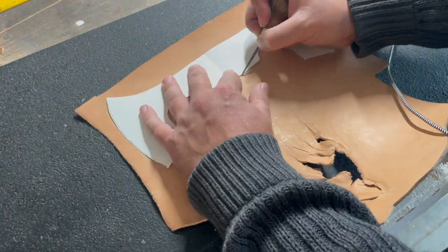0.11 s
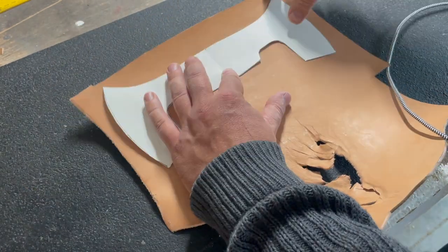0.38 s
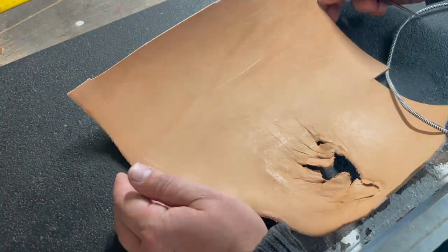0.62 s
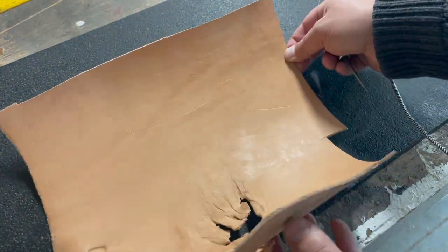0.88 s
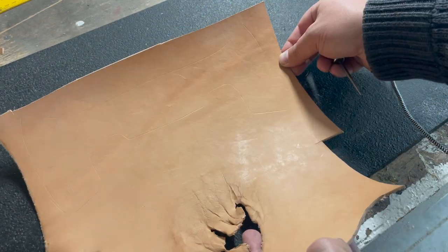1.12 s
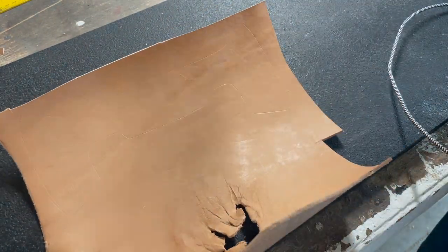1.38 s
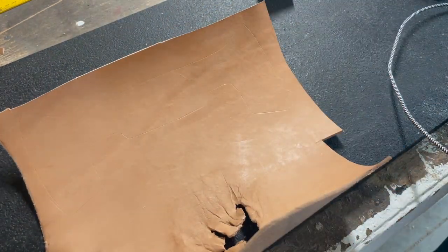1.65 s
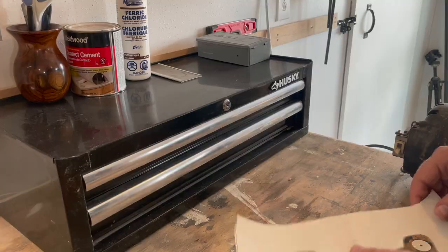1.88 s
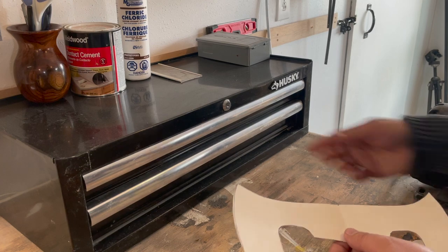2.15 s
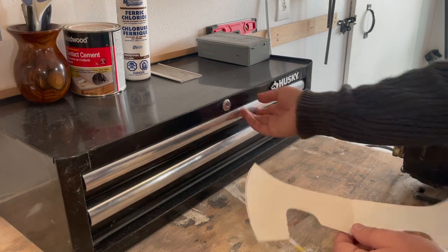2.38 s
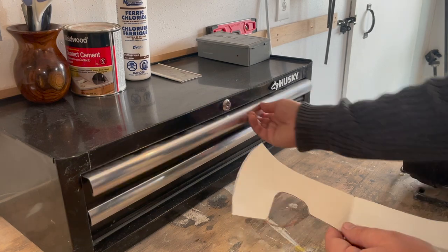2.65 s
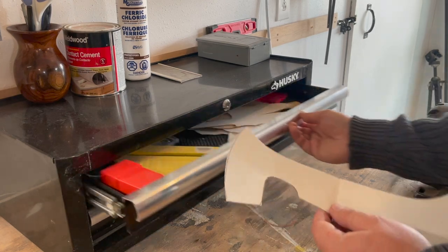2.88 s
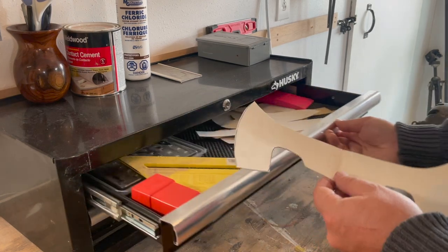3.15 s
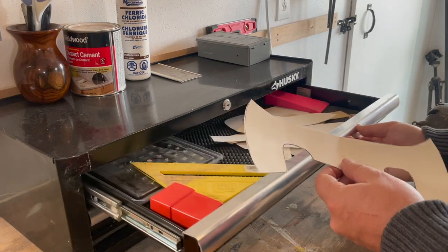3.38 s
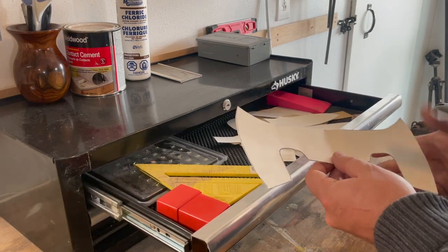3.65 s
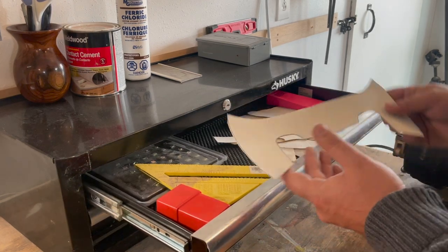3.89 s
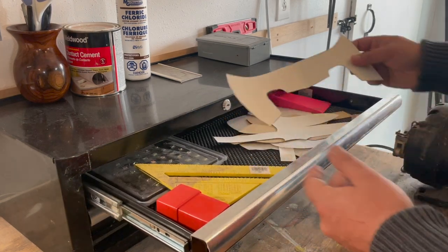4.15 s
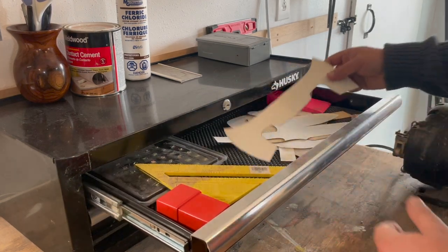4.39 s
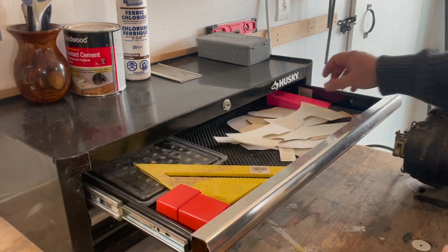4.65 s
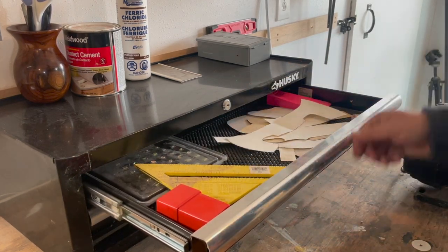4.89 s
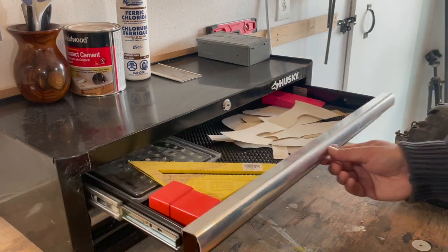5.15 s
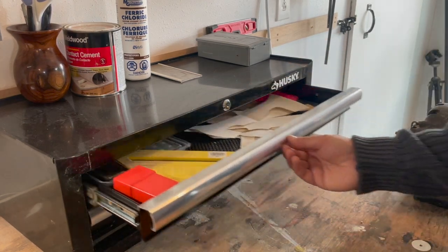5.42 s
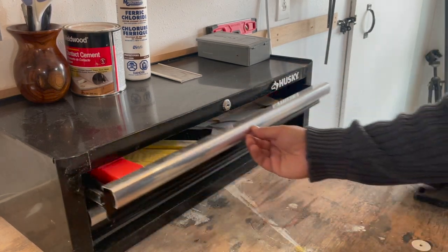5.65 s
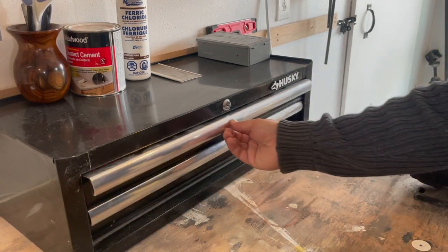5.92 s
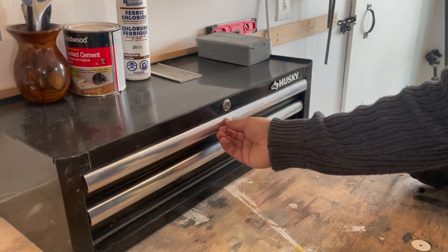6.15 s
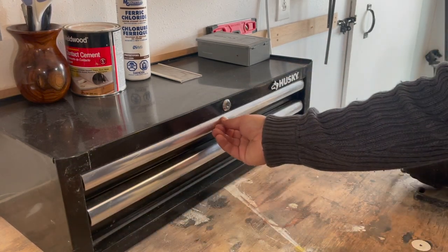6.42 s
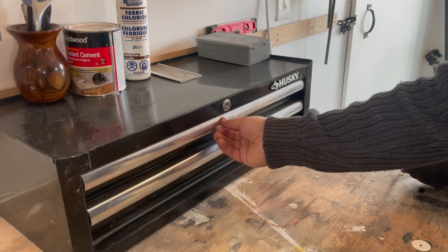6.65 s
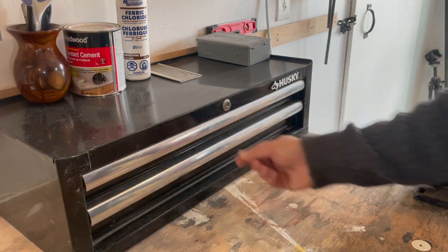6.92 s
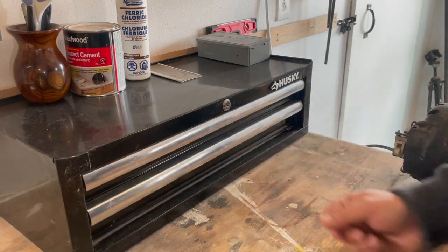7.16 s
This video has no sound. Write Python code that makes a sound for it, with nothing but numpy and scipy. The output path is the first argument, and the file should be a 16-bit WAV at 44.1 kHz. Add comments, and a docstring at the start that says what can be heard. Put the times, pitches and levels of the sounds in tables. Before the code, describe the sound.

Hurried bassless scrapes and ticks at a workbench, then a steel tool chest drawer rolls out, receives a card pattern, and closes with a ringing knock.

```python
"""Thin, bassless scratching and tapping come first: an awl at a leather bench in fast-forward, then a dropped tool.
At normal speed a steel chest drawer is unlatched and rolls out on ball runners, a card pattern is laid in,
and the drawer is pushed shut with a knock that rings the chest and the workshop.
Friction is coloured, fluttering noise; contacts are short bursts in three bands; sheet steel is a set of
decaying modes; the room is a tail of noise whose frequencies die at their own speeds."""
import sys
import numpy as np
from scipy import signal
from scipy.fft import rfft, irfft, next_fast_len
from scipy.io import wavfile
from scipy.ndimage import map_coordinates

SR = 44100
rng = np.random.default_rng(int(sys.argv[2]) if len(sys.argv) > 2 else 0)


def unload_wav(signal):
    """Save mono or channel-first audio to the path in sys.argv[1] as 16-bit WAV at rate SR, clipped to [-1, 1]."""
    wavfile.write(
        sys.argv[1],
        SR,
        np.round(np.clip(np.atleast_2d(signal).T, -1, 1) * 32767).astype(np.int16),
    )


def amplitude_ratio(level_db):
    """Convert a level in decibels to the matching linear amplitude (field) ratio."""
    exponent = np.asarray(level_db, float) / 20
    return 10 ** exponent


N = 321489

CUT_S = 1.813  # the fast-forward ends
SPEED_UP = 8  # the room dies this many times faster in fast-forward

# Contacts; each band peaks above its level by the excess in the band tables
# drawer knocks: t/s, bite level/dB, body level/dB, edge level/dB, chest level/dB (relative)
DRAWER_KNOCKS = [(2.365, -33.5, -34.5, -52, -40.5), (2.385, -38, -35, -57, -44),
                 (2.403, -52, -34.5, -61, -35), (2.4223, -38.5, -49, -67, -27.5),
                 (2.444, -59, -42.5, -75, -45), (2.479, -64, -64, -78, -29.5),
                 (2.505, -64, -60, -76, -40.5), (2.65, -43, -40, -77, -44), (2.682, -35, -44, -67, -52),
                 (2.706, -29, -36.5, -50, -45), (2.714, -35, -45, -64, -55), (2.72, -49, -33, -68, -59),
                 (2.778, -49, -48, -67, -46), (2.807, -54, -53, -72, -45), (2.909, -39, -44, -50, -41),
                 (2.925, -46, -40, -74, -24), (2.9386, -41.5, -30.5, -76, -37), (2.957, -45, -41, -82, -30),
                 (2.995, -60, -46, -80, -39), (4.99, -54, -49, -80, -46.5), (5.319, -64, -58, -75.5, -46),
                 (5.437, -69, -55, -72, -37.5), (5.462, -63, -53, -72, -44), (5.523, -63, -57, -74, -45),
                 (5.6127, -45, -46, -69, -24.5), (5.6297, -39.5, -41.5, -68, -46),
                 (5.641, -47, -41.5, -59, -46), (5.6982, -51, -46, -73, -34), (5.714, -60, -46, -75, -39),
                 (5.747, -58, -52, -72, -45), (5.7701, -43, -41, -62, -33.5),
                 (5.7877, -43.5, -38.5, -49.5, -41), (5.86, -65, -50.5, -72, -42),
                 (6.001, -46, -46, -68, -34), (6.0296, -39.5, -40.5, -64, -35.5),
                 (6.043, -54.5, -38.5, -82, -38.5), (6.106, -56, -49.5, -78, -46),
                 (6.3063, -32.5, -25.5, -45.5, -33.5), (6.3124, -29, -22, -56, -19),
                 (6.333, -36, -33, -58, -42.5), (6.359, -44, -28, -71, -29), (6.373, -48, -35.5, -72, -34),
                 (6.42, -47.5, -40, -58.5, -34), (6.7604, -59.5, -52.5, -68, -41),
                 (6.7986, -70, -51, -77, -41)]
# short contacts with their own ring: card, fingers, loose tools and the clack of the opening drawer:
# t/s, bite level/dB, body level/dB, edge level/dB, ring f/Hz
RINGING_SNAPS = [(1.816, -42.5, -40, -58, 2120), (1.899, -58, -40.5, -56, 1880),
                 (1.919, -40, -42, -56, 5800), (1.933, -50, -48, -60, 1290),
                 (1.9786, -34.5, -50, -65, 1350), (2.522, -40, -54, -72, 4110), (2.7, -26, -49, -60, 1690),
                 (2.708, -27, -52, -62, 1640), (2.716, -24.5, -57, -64, 1885), (2.721, -29, -55, -64, 2640),
                 (2.727, -45, -38, -66, 1650), (2.739, -50, -54, -66, 2260), (3.3336, -48, -53, -68, 2230),
                 (3.4251, -58, -41.5, -85, 1740), (3.6842, -53, -66, -76, 2530),
                 (3.712, -35.5, -43, -54.5, 2174), (3.748, -53, -73, -64, 2840),
                 (4.386, -56, -58, -87, 1490), (4.4015, -40.5, -52, -73, 1830),
                 (4.576, -54, -54, -75, 2260), (4.6058, -32.5, -46, -49, 1960),
                 (4.6244, -51, -56, -70, 1860), (4.732, -54, -59, -75, 1720),
                 (4.988, -41.5, -60, -68, 1613), (5.221, -61, -73, -76, 4000), (5.259, -50, -58, -67, 1880),
                 (5.669, -43.5, -65, -65, 5300), (5.701, -43.5, -65, -75, 3530),
                 (5.772, -36.5, -52, -66, 4770), (6.209, -53.5, -43, -95, 2320),
                 (7.124, -55, -63, -82, 2470), (7.187, -57, -64, -71, 2380)]
# taps on the bench: t/s, bite level/dB, body level/dB, edge level/dB, ring f/Hz
BENCH_TAPS = [(0.0855, -50.5, -74, -56, 1930), (0.1191, -64, -51.5, -65, 1770),
              (0.3499, -73, -69, -62, 2830), (0.3673, -57.5, -72, -57.5, 2100),
              (0.4273, -53.5, -73, -57, 2030), (0.4545, -55, -64, -58.5, 2100),
              (0.4774, -49.5, -80, -41.5, 3600), (0.5321, -47, -73, -60, 1960),
              (0.5745, -44.5, -38.5, -57, 2200), (0.6485, -63, -62, -65, 1800),
              (0.7085, -49, -74, -41, 1810), (0.717, -60, -69, -45.5, 2000), (0.742, -60, -71, -49, 2590),
              (0.761, -58, -70, -54, 2500), (0.814, -60, -60, -55.5, 2500), (0.8275, -51, -57, -44.5, 2140),
              (0.865, -56, -68, -54.5, 5000), (0.8715, -52, -55.5, -42.5, 1930),
              (0.8813, -56, -64, -43.5, 3000), (0.911, -55, -71, -54, 2500), (0.988, -54, -73, -65, 3030),
              (1.3092, -50, -73, -55, 2460), (1.3722, -50, -78, -51, 2350),
              (1.449, -55.5, -63, -71.5, 2180), (1.6506, -48.5, -58, -51, 2940),
              (1.704, -50, -57, -60.5, 2460), (1.708, -37.5, -60, -51, 2040), (1.7251, -21, -51, -22, 1990),
              (1.7328, -30, -49, -40, 1970), (1.7379, -32, -58, -39.5, 2080), (1.7443, -50, -65, -46, 2000),
              (1.75, -50, -69, -51, 3000), (1.806, -48.5, -62, -54, 2240)]
# bite, body and edge bands: low f/Hz, high f/Hz, peak excess/dB
KNOCK_BANDS = [(1350, 7800, 2), (436, 1210, 0), (8740, 11250, 9.5)]
SNAP_BANDS = [(975, 7100, 2.2), (405, 1190, 2.6), (8800, 10700, 8.3)]
TAP_BANDS = [(1290, 5660, 4), (577, 987, 4.5), (6700, 15500, 5)]
# pings of a struck small part: multiple of its ring, level/dB
PING_OVERTONES = [(1, -4), (1.471, -10.5), (2.3, -12.5)]
KNOCK_T60_S, SNAP_T60_S, TAP_T60_S = 0.059, 0.066, 0.021

# Steel bodies
# big chest panels when struck: f/Hz, level/dB, t60/s
CHEST_MODES = [(75.6, -8, 0.91), (111.5, -2.5, 0.41), (128.35, -4, 0.63), (165, 3.5, 0.19),
               (195.5, 2.5, 0.092), (221.5, -1.5, 0.2), (265.4, -9, 0.52), (287, -4.5, 0.13),
               (348, -8, 0.2), (432.7, -3, 0.19)]
# drawer front when struck: f/Hz, level/dB, t60/s
FRONT_MODES = [(615, -6, 0.12), (738, -1.5, 0.064), (881, -2.5, 0.091), (930, -1, 0.073),
               (1058, -3.5, 0.057), (1196, -5, 0.12), (1244, -17, 0.11), (1414, -2, 0.055),
               (1520, -10.5, 0.1), (1656, -20.5, 0.13), (1735, -11.5, 0.071), (1960, -11, 0.13),
               (2320, -9, 0.09), (2560, -18.5, 0.18), (2970, -20, 0.084), (3730, -19.5, 0.08),
               (3870, -35, 0.065)]
# panels shaken by rolling: f/Hz, width/Hz, level/dB
PANEL_MODES = [(111, 50.5, 1.5), (171, 47, 3.5), (205.4, 35, 2), (268.5, 72, -5)]
# runner rails: f/Hz, width/Hz, level/dB
RUNNER_MODES = [(324, 50, 2), (453.6, 31, 2.5), (561, 126, -6.5), (725, 84, -4), (888, 110, -10.5)]
RUNNER_SHIFT = 1.121  # the raised set of rail modes lies this many times higher

# Movement
# the drawer rolling out, then in: t/s, chest level/dB, runner level/dB, scrape level/dB
DRAWER_ROLL = [
    [(2.37, -76, -78, -86), (2.42, -37, -57, -50), (2.52, -40.5, -77, -83), (2.59, -50, -52, -57.5),
     (2.66, -47, -46, -57), (2.73, -46.5, -41.5, -57.5), (2.9, -51.5, -44, -58),
     (2.98, -44.5, -45.5, -60.5), (3.15, -44.5, -55, -67), (3.36, -55, -56.5, -70), (3.55, -57.5, -68, -79),
     (3.8, -75, -78, -83)],
    [(5.0, -73, -85, -91), (5.09, -49, -61, -74), (5.17, -57.5, -65, -72), (5.27, -53.5, -51.5, -65.5),
     (5.45, -55, -49.5, -67), (5.6, -45, -43.5, -61), (5.77, -41.5, -46.5, -63), (5.88, -44, -54.5, -69.5),
     (5.99, -56, -58, -74), (6.1, -54.5, -64, -100), (6.3, -70, -59, -69.5), (6.4, -73, -79, -92)],
]
ROLL_HISS_DB = -9  # rustle over scrape while rolling
# chest, runner, scrape and rustle just after a knock: level/dB over the knock's chest level
SHUDDER_OVER_DB = [-15, -16, -34.5, -38]
# decay of the same four layers: t60/s
SHUDDER_T60_S = [0.62, 0.46, 0.44, 0.11]
SHUDDER_RISE_S = 0.0019
# the same four layers while the chest rests: level/dB
IDLE_DB = [-67, -75.5, -81, -88]
# short swells of friction, from sleeves, hands, card, and steel scraping in the runners:
# peak t/s, rise/s, fall/s (each spans 20 dB), low level/dB, scrape level/dB, rustle level/dB
FRICTION_SWELLS = [(1.87, 0.14, 0.11, -56, -60, -63.5), (1.925, 0.07, 0.15, -50, -51, -53.5),
                   (2.02, 0.19, .3, -63, -62, -67), (2.33, 0.14, 0.38, -69, -75, -74),
                   (2.528, 0.022, 0.064, -51, -55, -60), (2.69, 0.016, 0.02, -59, -52, -44.5),
                   (2.718, 0.06, 0.027, -58, -37.5, -68), (2.91, 0.0052, 0.04, -55, -50.5, -55.5),
                   (3.42, 0.093, 0.21, -57.5, -63.5, -77), (3.72, 0.28, 0.24, -59, -69.5, -65.5),
                   (3.893, 0.15, 0.1, -66, -65.5, -56), (3.98, 0.15, 0.084, -58.5, -70, -85),
                   (4.42, 0.067, 0.11, -58, -61.5, -68.5), (4.552, 0.22, 0.027, -67, -68.5, -66.5),
                   (4.63, 0.14, 0.097, -62.5, -63, -72), (4.73, 0.086, 0.09, -66, -70, -86),
                   (5.01, 0.042, 0.088, -55.5, -77, -72.5), (5.5, 0.41, 0.63, -72, -80, -66),
                   (5.79, 0.021, 0.023, -52, -61, -53), (6.037, 0.044, 0.027, -43.5, -49, -69),
                   (6.422, 0.016, 0.048, -60, -70, -64), (6.75, 0.014, 0.038, -66.5, -68, -66),
                   (6.978, 0.02, 0.072, -83, -100, -72.5), (7.128, 0.016, 0.025, -70, -62, -91.5),
                   (7.196, 0.073, 0.17, -75, -70.5, -71)]
# hand and awl strokes on leather: peak t/s, rise/s, fall/s (each spans 20 dB),
# low level/dB, rub level/dB, scratch level/dB
AWL_STROKES = [(.13, 0.072, 0.021, -54, -64, -67), (.25, 0.085, 0.04, -60.5, -88, -71),
               (.494, 0.065, 0.055, -61, -69, -51), (.544, 0.049, 0.026, -62, -59, -74),
               (.69, 0.06, 0.12, -60.5, -66, -59), (.77, 0.15, .1, -59, -68.5, -60),
               (.82, .06, 0.054, -60, -65, -58), (.868, 0.095, 0.07, -57.5, -61, -53),
               (.992, 0.33, 0.42, -67, -72.5, -80), (1.322, 0.165, 0.39, -63.5, -66.5, -68.5),
               (1.62, 0.1, 0.048, -87, -65, -68.5), (1.79, 0.017, 0.026, -56, -75, -68),
               (1.819, 0.03, .03, -58.5, -68, -61)]
SHOP_DB, RUB_DB, SCRATCH_DB = -67.5, -74.5, -85.5  # steady levels at the bench
HUM_HZ = 957  # mains hum raised by the speed
# slow swell of the hum: t/s, level/dB
HUM_SWELL = [(0, -86), (.4, -80), (.8, -76), (.95, -74.5), (1.45, -76.5), (1.8, -85)]

# Spectra: f/Hz, level/dB per Hz
SCRAPE_COLOUR = [(650, -28), (1100, 0.5), (1630, 0), (2480, -7), (2700, -5), (3410, -21.5), (5460, -13.5),
                 (7000, -24.5), (9100, -96), (15400, -120)]  # scraping
RUSTLE_COLOUR = [(1180, -53), (2000, -9.5), (3210, 1.5), (3480, 1), (4630, 0), (7730, -7), (11400, -4.5),
                 (13300, -14.5), (14000, -34.5)]  # brighter rustling
SHOP_COLOUR = [(88, -69.5), (150, -32.5), (345, -12.5), (394, -4), (641, -7), (934, -15), (1020, -12),
               (1700, -36), (2210, -40), (3740, -120)]  # workshop tone in fast-forward
RUB_COLOUR = [(760, -29), (1300, 0.5), (2520, 3), (3520, -4), (5310, -7), (6500, -9.5), (8450, -26),
              (14300, -120)]  # hand on leather
SCRATCH_COLOUR = [(4000, -34.5), (6000, -12), (7500, -8), (10400, -6), (14500, -11.5), (16000, -19),
                  (17000, -61.5)]  # awl on leather
AIR_COLOUR = [(12, -46), (20, -30), (54, 4), (112, -5), (152, -37.5), (263, -6.5), (397, -18.5), (443, -14),
              (954, -23), (2290, -30), (5220, -39.5), (7660, -57), (10900, -50.5), (14000, -60)]  # quiet workshop
AIR_DB = -58

# Stereo and room
# microphone treble for contacts at normal speed: f/Hz, level/dB
MICROPHONE = [(5500, -2.5), (7600, -13.5), (10000, -2), (12500, -5.5), (14000, -25), (16000, -45)]
# left-right likeness of drawer, bench and air: f/Hz, likeness (0-1)
ALIKE_DRAWER = [(60, 1), (150, 0.91), (300, 0.88), (600, 0.061), (2500, 0.57), (8000, 0.029)]
ALIKE_BENCH = [(300, 0.95), (1400, .8), (3000, 0.6), (7000, 0.04)]
ALIKE_AIR = [(60, 1), (150, 0.71), (300, 0.6), (600, 0.09), (2500, 0.55), (8000, 0.035)]
# phase of left ahead of right, for drawer contacts and bench taps: f/Hz, lead/rad
LEAD_DRAWER = [(300, 0.14), (700, 1), (3500, 0.62), (7000, 1), (14000, 0.66)]
LEAD_BENCH = [(1500, 0), (3500, 1.1), (5000, 2), (6500, 0.5), (10000, 0.055), (15000, 1.2)]
# left over right for drawer contacts and bench taps (on top of their pan), and rolling: f/Hz, level/dB
BALANCE_DRAWER = [(60, -0.5), (150, 0), (380, -2.5), (950, 1.5), (2380, 2), (5980, 3), (15000, -4)]
BALANCE_BENCH = [(60, -0.5), (180, 4), (550, -0.5), (1650, -2.5), (4970, 2.5), (15000, 3)]
BALANCE_ROLL = [(60, 3), (180, 0.1), (330, -4.5), (650, -0.5), (1650, 1), (4970, 3.5), (15000, -2)]
# workshop decay before the room's speed factor: f/Hz, t60/s
WORKSHOP_DECAY = [(100, 0.4), (500, 0.92), (2000, 0.71), (10000, 0.21)]


def drawer():
    """Balls rumble along the runners and shake the panels; latch, stops and card add contacts."""
    shake, roll, scrape, rustle = motion()
    bed = shake * rush(modes(PANEL_MODES), ALIKE_DRAWER, rate=25, lumpy_db=2.5)
    bed += roll * runners()
    bed += scrape * rush(shaped(SCRAPE_COLOUR), ALIKE_DRAWER, rate=79, lumpy_db=3.0)
    bed += rustle * rush(shaped(RUSTLE_COLOUR), ALIKE_DRAWER, rate=310, lumpy_db=1.0)

    times, bite_db, body_db, _, chest_db = np.transpose(DRAWER_KNOCKS)
    # a sharp blow wakes the upper modes, a blunt one the lower
    upper = np.transpose(FRONT_MODES)[0, :, None] > 1560
    front_db = np.where(upper, bite_db[:, None, None] + 2.5, body_db[:, None, None] + 0.19)
    chest = ringing(times, chest_db - 6.5, CHEST_MODES, attack_s=0.0028)
    front = ringing(times, front_db, FRONT_MODES, attack_s=0.0048)
    knocks = contacts(DRAWER_KNOCKS, np.full(len(times), 2100), 0.77, KNOCK_BANDS, KNOCK_T60_S,
                      rise=0.0096, tick=0.59, sharp=1.3, click=3.8, ping=0.069, ring=1.86, thud=0.12)
    snaps = contacts(RINGING_SNAPS, [row[4] for row in RINGING_SNAPS], 0.36, SNAP_BANDS, SNAP_T60_S,
                     rise=0.0028, tick=4.5, sharp=3.6, click=5.3, ping=1.07, ring=2.6, thud=0.11)

    hits = knocks + snaps + chest + front
    sent = hits - 0.5 * snaps - 0.5 * front  # the snaps and the near drawer front stir the room less
    near = ported(hits + amplitude_ratio(-3.5) * rattle(scrape), LEAD_DRAWER, BALANCE_DRAWER)
    heard = near + amplitude_ratio(-7.5) * room(sent.mean(0), 0.95, ALIKE_DRAWER)
    return ported(bed, [(100, 0.0068)], BALANCE_ROLL) + filtered(heard, shaped(MICROPHONE))


def contacts(rows, rings_hz, pan_db, bands, t60, rise, tick, sharp, click, ping, ring, thud):
    """Each contact is a tick and a dying noise burst in a ringing bite band, a body band and an edge band."""
    out, t = np.zeros(N + SR), np.arange(SR // 11) / SR
    filters = [signal.butter(3, [low, high], "bandpass", fs=SR, output="sos") for low, high, _ in bands]
    fade = amplitude_ratio(-60 * t / t60)
    shape = (fade + tick * amplitude_ratio(-60 * t / 0.0026)) * (1 - np.exp(-t / (rise * t60)))
    body_hz = np.sqrt(bands[1][0] * bands[1][1])
    thump = signal.sosfilt(filters[1], fade * np.sin(2 * np.pi * body_hz * t))
    for (s, *levels, _), ring_hz in zip(rows, rings_hz):
        blow = shape * rng.standard_normal(len(t))
        blow[3] += click  # the first hard touch
        bite, body, edge = [signal.sosfilt(sos, blow) for sos in filters]
        bite = bite + ring * signal.lfilter(*signal.iirpeak(ring_hz, sharp, fs=SR), bite)
        tones = sum(amplitude_ratio(db) * np.sin(2 * np.pi * k * ring_hz * t) for k, db in PING_OVERTONES)
        bite = bite + ping * fade * tones
        body = body + thud * thump
        for db, (_, _, excess_db), part in zip(levels, bands, (bite, body, edge)):
            out[round(s * SR):][:len(t)] += amplitude_ratio(db + excess_db) * part / np.abs(part).max()
    return amplitude_ratio([[pan_db / 2], [-pan_db / 2]]) * out[:N]


def ringing(times, levels_db, steel, attack_s):
    """Every knock rings the sheet steel; each mode is a beating pair at new strengths."""
    longest_s = min(.6, max(mode[2] for mode in steel))
    out, t = np.zeros(N + SR), np.arange(int(longest_s * SR)) / SR
    hz, mode_db, t60 = np.transpose(steel)[:, :, None]
    fade = amplitude_ratio(-60 * t / t60) * (1 - np.exp(-t / attack_s))
    for s, db in zip(times, levels_db):
        size, tune, beat = rng.standard_normal((3, len(steel), 1))
        tone = np.sin(2 * np.pi * hz * (1 + 0.0083 * tune) * t)
        beating = np.cos(2 * np.pi * hz * 0.0062 * beat * t)
        out[round(s * SR):][:len(t)] += (amplitude_ratio(db + mode_db + 1.4 * size) * fade * tone * beating).sum(0)
    return out[:N]


def motion():
    """Gains of chest, runner, scrape and rustle: rest, rolling, the shudder after each knock, friction swells."""
    t = np.arange(N) / SR
    times, *levels = np.concatenate(DRAWER_ROLL).T
    levels.append(levels[2] + ROLL_HISS_DB)
    power = amplitude_ratio([np.interp(t, times, db) for db in levels]) ** 2
    since = t[:SR // 3]
    over_db, t60 = np.transpose([SHUDDER_OVER_DB]), np.transpose([SHUDDER_T60_S])
    shudder = amplitude_ratio(over_db - 60 * since / t60) * (1 - np.exp(-since / SHUDDER_RISE_S))
    for s, *_, chest_db in DRAWER_KNOCKS:
        power[:, round(s * SR):][:, :len(since)] += (amplitude_ratio(chest_db) * shudder) ** 2
    power[0] += amplitude_ratio(IDLE_DB[0] + 2.5 * wobble(8.9)) ** 2
    power[1:] += swells(FRICTION_SWELLS, IDLE_DB[1:]) ** 2
    return np.sqrt(power)


def runners():
    """Balls bump over the rails in grains; the sound wanders between a lower and a raised set of rail modes."""
    drive = rng.standard_normal((2, N)) * amplitude_ratio(1.2 * wobble(50))
    drive = drive + 0.87 * unit(crackle(rate=200, spread_db=2.0))
    share = np.pi / 4 * (1 + np.tanh(1.47 * wobble(7.5)))  # crossfade angle
    raised = [(hz * RUNNER_SHIFT, width_hz, db) for hz, width_hz, db in RUNNER_MODES]
    lower_rails = paired(drive * np.cos(share), modes(RUNNER_MODES), ALIKE_DRAWER)
    raised_rails = paired(drive * np.sin(share), modes(raised), ALIKE_DRAWER)
    return unit(lower_rails + raised_rails)


def rattle(scrape):
    """Loose balls tick at random and ring the drawer front, its upper modes most, louder as the steel scrapes."""
    front = [(hz, 6 / t60, db + 7 * np.log2(hz / 1500)) for hz, db, t60 in FRONT_MODES]
    return scrape * unit(filtered(crackle(rate=350, spread_db=4.5)[0], modes(front)))


def bench():
    """Hurried handwork: shop tone, rubbing leather, a scratching awl, hum and taps in a shrunken room."""
    low, rub, scratch = swells(AWL_STROKES, [SHOP_DB, RUB_DB, SCRATCH_DB])
    bed = low * amplitude_ratio(0.71 * wobble(12)) * rush(shaped(SHOP_COLOUR), ALIKE_BENCH, rate=50, lumpy_db=4.0)
    bed += rub * rush(shaped(RUB_COLOUR), ALIKE_BENCH, rate=90, lumpy_db=2.5)
    bed += scratch * rush(shaped(SCRATCH_COLOUR), ALIKE_BENCH, rate=74, lumpy_db=5.5)
    # the point catches in the grain
    catches = unit(filtered(crackle(rate=250, spread_db=4.5), shaped(SCRATCH_COLOUR)))
    bed += amplitude_ratio(-7.0) * scratch * catches
    rub_grains = unit(filtered(crackle(rate=230, spread_db=1), shaped(RUB_COLOUR)))
    bed += amplitude_ratio(-9) * rub * rub_grains
    taps = contacts(BENCH_TAPS, [row[4] for row in BENCH_TAPS], -0.82, TAP_BANDS, TAP_T60_S,
                    rise=0.0043, tick=2.0, sharp=1.5, click=4.1, ping=0.15, ring=1.1, thud=0.42)
    whole = bed + hum() + ported(taps, LEAD_BENCH, BALANCE_BENCH)
    whole += amplitude_ratio(-4.5) * room(taps.mean(0), SPEED_UP, ALIKE_BENCH)
    # the speed lifts everything out of the bass
    return signal.sosfilt(signal.butter(3, 170, "highpass", fs=SR, output="sos"), whole)


def hum():
    """Mains hum raised by the speed: one sine wavering in level and phase."""
    t = np.arange(N) / SR
    swell_db = np.interp(t, *np.transpose(HUM_SWELL))
    level = amplitude_ratio(swell_db + 3.0 * wobble(19.0)) * np.sqrt(2)
    return level * np.sin(2 * np.pi * HUM_HZ * t + 1.3 * wobble(30))


def room(x, speed, alike):
    """Each frequency of the room's answer dies at its own speed; a new tail every quarter second."""
    out, step = np.zeros((2, N + 2 * SR)), SR // 4
    for i in range(0, N, step):
        if x[i:i + step].any():
            noise = rng.standard_normal((2, int(.7 * SR / speed)))
            hz, t, z = signal.stft(noise, SR, nperseg=256)
            t60 = along(WORKSHOP_DECAY, hz / speed)[:, None]
            tail = signal.istft(z * amplitude_ratio(-60 * t * speed / t60), SR, nperseg=256)[1]
            wet = signal.fftconvolve(x[None, i:i + step], tail / np.linalg.norm(tail[0]), axes=1)
            out[:, i + int(200 / speed):][:, :wet.shape[1]] += wet  # 200 samples of delay, cut by speed
    return paired(out[:, :N], np.ones_like, alike)


def air():
    """The low rumble and faint hiss of the quiet workshop, as steady coloured noise."""
    return amplitude_ratio(AIR_DB + 0.24 * wobble(4.047)) * rush(shaped(AIR_COLOUR), ALIKE_AIR, rate=15.0, lumpy_db=0.5)


def rush(colour, alike, rate, lumpy_db):
    """Stereo friction noise of rms 1 whose grip flutters at rate knots a second."""
    return unit(paired(rng.standard_normal((2, N)) * amplitude_ratio(lumpy_db * wobble(rate)), colour, alike))


def crackle(rate, spread_db):
    """Sparse single clicks of varying size, about rate a second, each leaning at random to left or right."""
    luck = rng.random(N)
    size_db, sign, side_db = rng.standard_normal((3, N))
    sizes = amplitude_ratio(spread_db * size_db + 4.3 * side_db * [[1], [-1]])
    return (luck < rate / SR) * np.sign(sign) * sizes


def swells(rows, steady_db):
    """Gain of each layer: its steady level plus, in power, every stroke rising to its peak and falling away."""
    t = np.arange(N) / SR
    power = amplitude_ratio(np.transpose([steady_db])) ** 2 * np.ones(N)
    for s, rise, fall, *levels in rows:
        near = slice(max(0, round((s - 2 * rise) * SR)), round((s + 2 * fall) * SR))
        away = t[near] - s
        drop_db = 20 * np.maximum(-away / rise, away / fall)
        power[:, near] += amplitude_ratio(np.transpose([levels]) - drop_db) ** 2
    return np.sqrt(power)


def ported(pair, lead, balance_db):
    """Two microphone ports hear a near source with a phase lead and a level difference, half on each side."""
    sides = np.array([[1], [-1]])
    return filtered(pair, lambda f: np.exp(.5j * along(lead, f) * sides) * amplitude_ratio(along(balance_db, f) / 2 * sides))


def paired(pair, colour, alike):
    """Two signals coloured and blended as mid and side; unrelated ones gain the given left-right likeness."""
    def response(f):
        turn = np.arccos(np.clip(along(alike, f), -1, 1)) / 2
        return colour(f) * [np.cos(turn), np.sin(turn)]
    mid, side = filtered(pair, response)
    return np.array([mid + side, mid - side])


def modes(peaks):
    """Response of a body with several modes, with steep skirts around them."""
    low, high = peaks[0][0], peaks[-1][0]

    def response(f):
        skirt = resonance(f, np.sqrt(low * high), 1.33 * high) ** 2
        return skirt * sum((-1) ** k * amplitude_ratio(db) * resonance(f, hz, width_hz)
                           for k, (hz, width_hz, db) in enumerate(peaks))
    return response


def resonance(f, hz, width_hz):
    """Causal response of one damped mode."""
    return 1j * f * width_hz / (hz * hz - f * f + 1j * f * width_hz)


def shaped(spectrum):
    """Gain of a spectrum table as a function of frequency."""
    return lambda f: amplitude_ratio(along(spectrum, f))


def filtered(x, response):
    """x passed through a complex response of frequency."""
    m = next_fast_len(N + SR // 2)
    return irfft(rfft(x, m) * response(np.fft.rfftfreq(m, 1 / SR)), m)[..., :N]


def along(points, hz):
    """Reads (f/Hz, value) points on a log frequency axis."""
    f, v = np.transpose(points)
    return np.interp(np.log(hz + 1), np.log(f + 1), v)


def wobble(rate):
    """A smooth random curve, rate knots a second."""
    return map_coordinates(rng.standard_normal(int(N * rate / SR) + 4), [np.arange(N) * rate / SR])


def unit(x):
    """Scales to rms 1."""
    return x / np.sqrt(np.mean(x ** 2) + 1e-20)


def scene():
    """The fast-forward gives way to normal speed within three milliseconds."""
    after = np.clip((np.arange(N) / SR - CUT_S) / .003, 0, 1)
    return (1 - after) * bench() + after * (drawer() + air())


def low_pass(x):
    """Removes everything above the highest recorded frequency."""
    return signal.sosfilt(signal.butter(12, 16520, fs=SR, output="sos"), x)


def record(dry):
    """Delivers the finished mix."""
    return low_pass(dry)


dry = scene()
out = record(dry)
unload_wav(out)
```